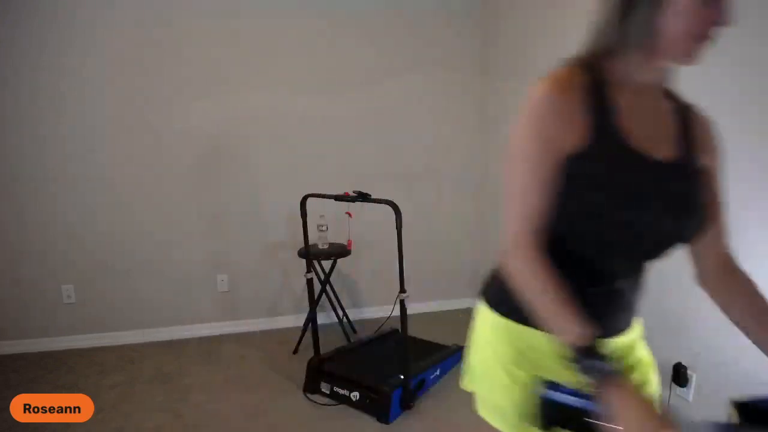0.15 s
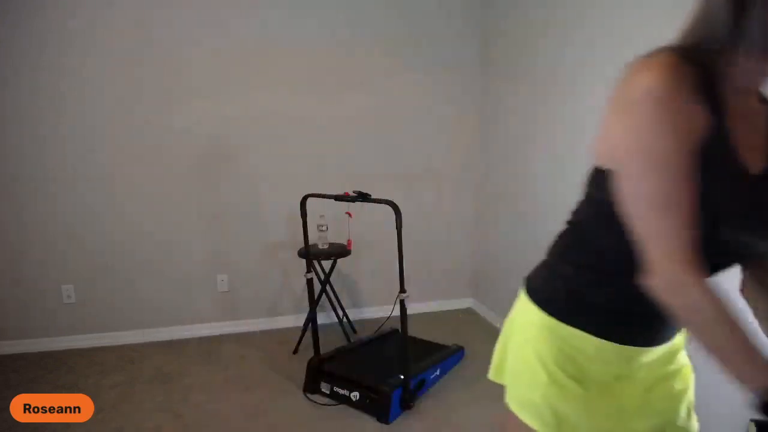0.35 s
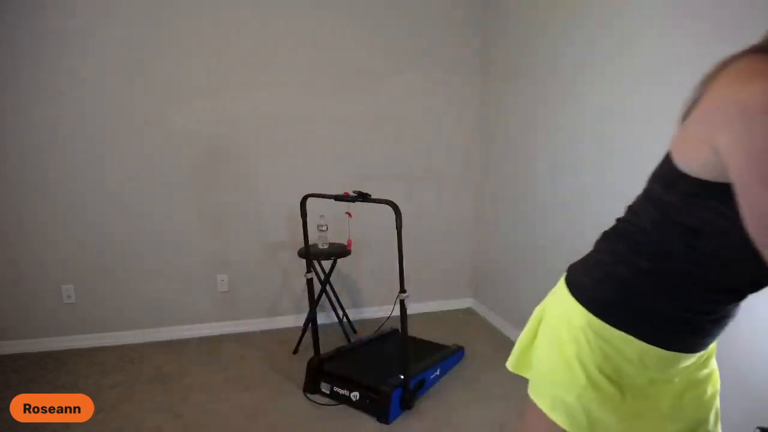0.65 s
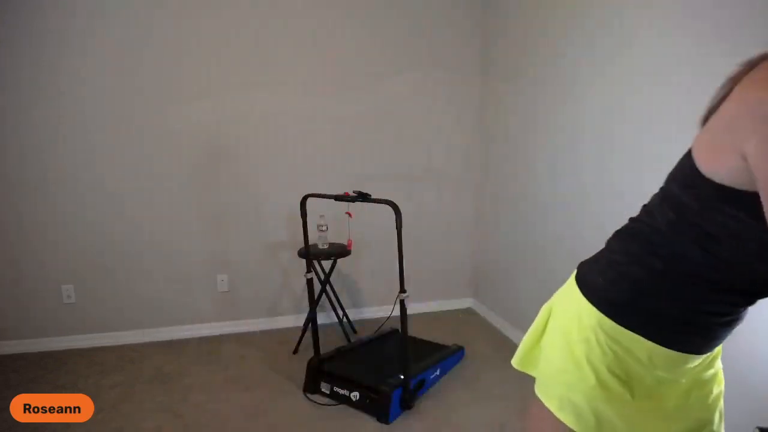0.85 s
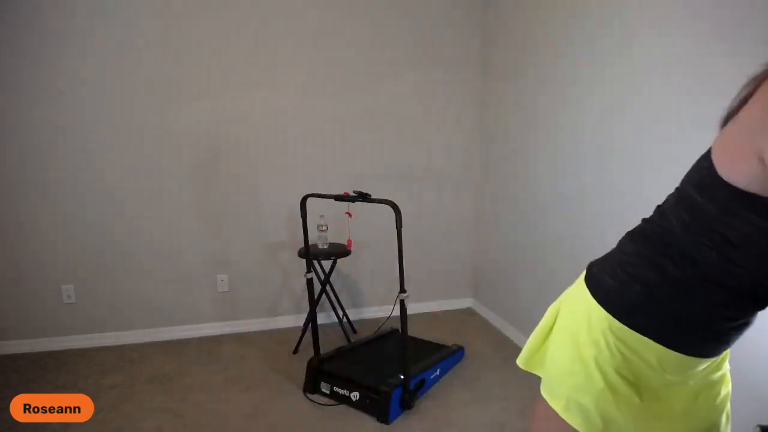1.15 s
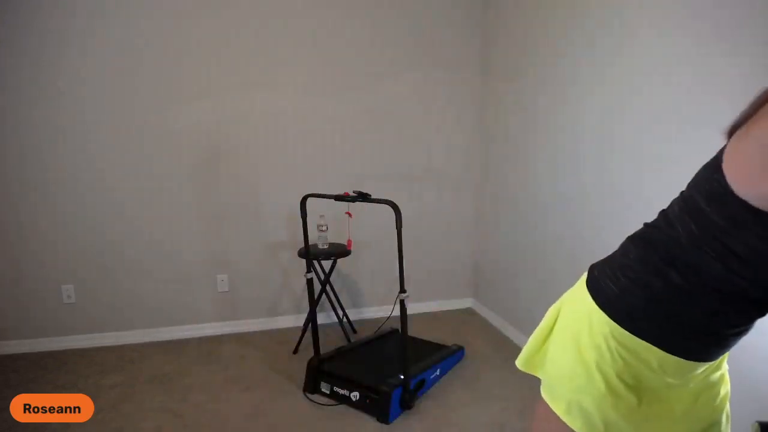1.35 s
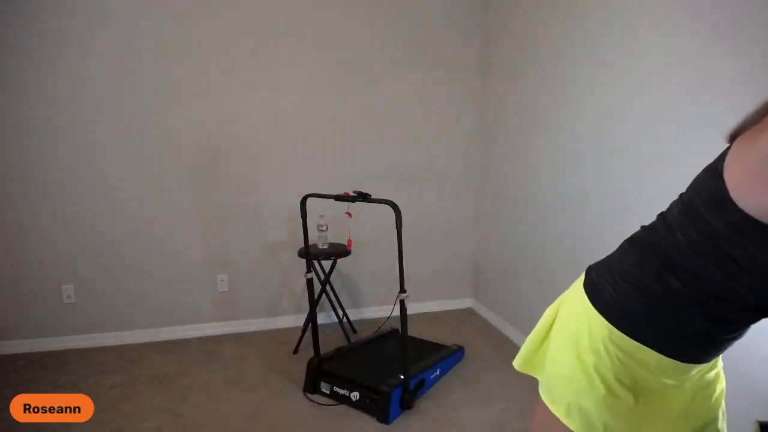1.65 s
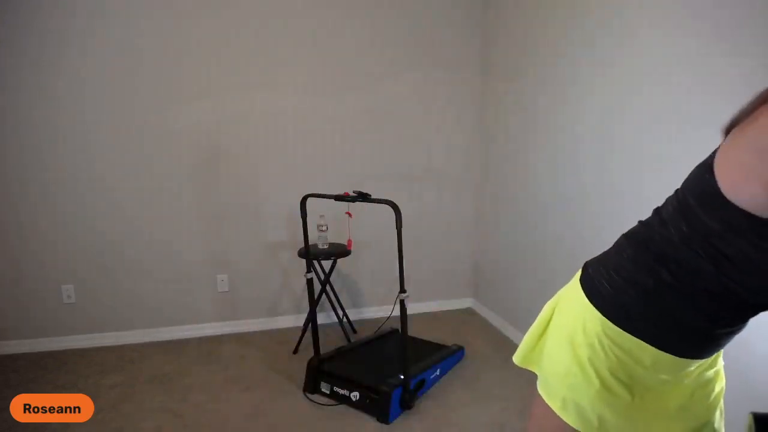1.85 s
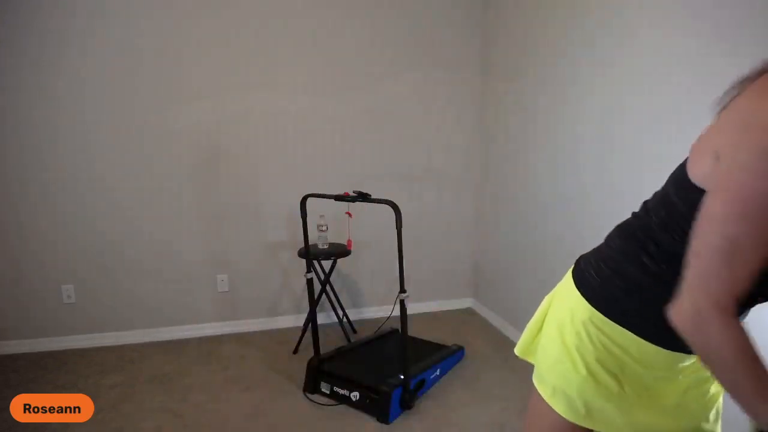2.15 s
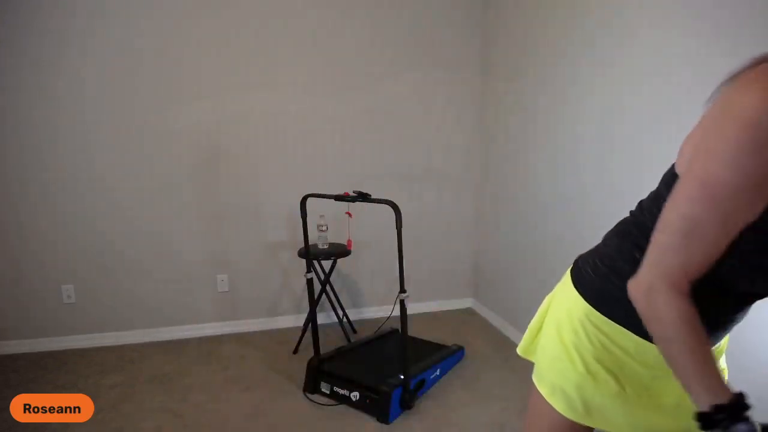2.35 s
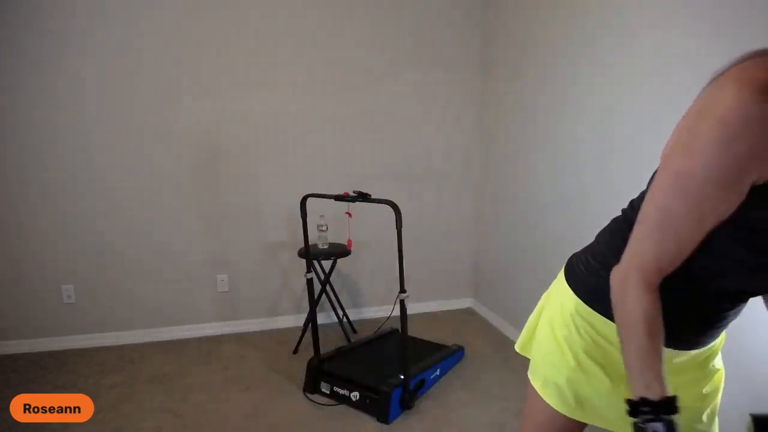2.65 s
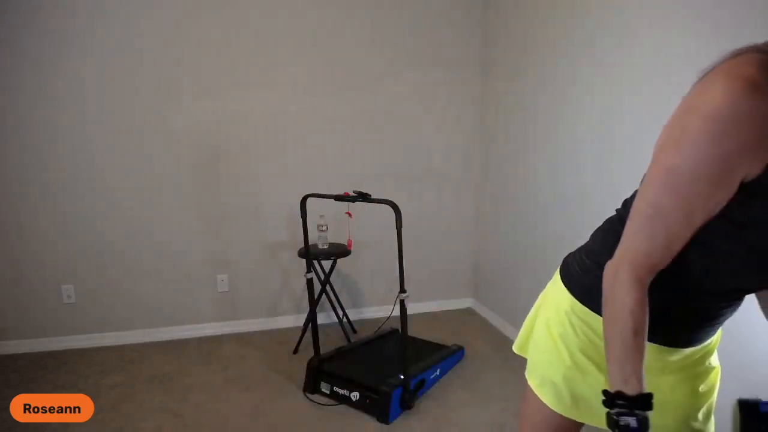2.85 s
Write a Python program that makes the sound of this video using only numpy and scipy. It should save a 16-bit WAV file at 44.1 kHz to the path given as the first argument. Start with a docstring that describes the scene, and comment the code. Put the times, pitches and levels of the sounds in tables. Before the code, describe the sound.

Metal dumbbells clatter onto a stand, close by in a bare room. The loose plates rub faintly until hard, clanging knocks begin at about 0.4 seconds, with a heavy thud near 0.8. Dense rattling follows from 1.2 to 1.7 seconds, then sharp clangs around 2 and from 2.4 to 2.6. Thin metallic ringing lingers between the blows and fades by 3 seconds over a very faint hum.

```python
"""In a bare room, two metal dumbbells are lowered onto their stand, close by.
The loose plates shift softly in the hand, then knock and chatter in a string of hard blows.
Each blow thuds through the stand, clangs in the plates and fills the room. Between blows a plate
or the bar rings on alone, over faint air noise and mains hum. A limiter holds down the loudest blows."""
import sys
import numpy as np
from scipy import signal
from scipy.io import wavfile
from scipy.ndimage import uniform_filter1d, minimum_filter1d

SR = 44100
rng = np.random.default_rng(int(sys.argv[2]) if len(sys.argv) > 2 else 0)


def dump(signal):
    """Clip the signal to [-1, 1] and save it as 16-bit WAV at the path in sys.argv[1]."""
    limited = np.clip(np.atleast_2d(signal).T, -1, 1)
    pcm = np.round(limited * 32767).astype(np.int16)
    wavfile.write(sys.argv[1], SR, pcm)


N = 132300   # 3 seconds

# Levels are relative. A t60 is the time a sound takes to fade by 60 dB.
# The blows. Thud to clash set the four crash bands; knock also sets how hard the stand rings.
# time_s, thud_db, knock_db, clang_db, clash_db, plate_ring_db, typical_bounce_gap_s
BLOW_LIST = [(0.416, -13.5, -15, -12, -26, -14, 0.0064), (0.458, -16.5, -17.5, -3, -19.5, -4, 0.0031),
             (0.501, -35, -44, -10.5, -43, -13, 0.0058), (0.527, -24, -19.5, -11, -30, -9.5, 0.0059),
             (0.637, -25, -20.5, -16, -30.5, -24, 0.0063), (0.664, -35, -24, -13.5, -35.5, -8.5, 0.006),
             (0.697, -37, -33, -31, -55, -23, 0.0059), (0.782, -10.5, -10, -3.5, -20.5, -13, 0.003),
             (0.822, -39, -25, -13.5, -45, -26, 0.0067), (0.892, -26.5, -22, -15.5, -32.5, -25, 0.0057),
             (0.937, -25.5, -24, -26, -40, -18.5, 0.0061), (1.063, -32, -12.5, -10.5, -28.5, -11.5, 0.003),
             (1.202, -34.5, -30.5, -21.5, -40, -37, 0.006),
             (1.252, -22.5, -21.5, -20.5, -35.5, -26, 0.0062),
             (1.292, -22, -16.5, -13.5, -25.5, -17, 0.0063), (1.337, -19.5, -13, -7.5, -19.5, -10, 0.0031),
             (1.357, -18, -19, -5.5, -21, -10, 0.0059), (1.392, -20.5, -19, -23, -27.5, -13.5, 0.006),
             (1.432, -23.5, -17.5, -14, -28, -21, 0.0056), (1.522, -25.5, -22, -19, -37, -21.5, 0.0062),
             (1.567, -48, -19.5, -15.5, -37, -17, 0.006), (1.611, -21, -9, -10.5, -22, -12, 0.0029),
             (1.655, -22.5, -16, -10.5, -27, -9, 0.0062), (1.692, -20, -16.5, -11.5, -25, -14, 0.0055),
             (1.709, -39, -33, -13.5, -58.5, -8.5, 0.0063), (1.909, -46, -25.5, -28.5, -46.5, -26, 0.0066),
             (1.989, -20, -21.5, -11.5, -28.5, -18, 0.0063), (2.039, -30, -20, -13, -25, -5, 0.0058),
             (2.061, -27, -20, -5, -25, 0.5, 0.0029), (2.207, -28.5, -32.5, -21.5, -43.5, -14.5, 0.006),
             (2.317, -44, -27.5, -25.5, -47, -29, 0.0064), (2.388, -21.5, -13.5, -5.5, -20.5, -8.5, 0.0061),
             (2.417, -18, -20.5, -11, -24, -8.5, 0.006), (2.454, -28, -21, -6.5, -36.5, -4.5, 0.006),
             (2.484, -25, -13.5, -8, -22.5, -11, 0.006), (2.517, -17.5, -15, -7.5, -21.5, -0.5, 0.003),
             (2.559, -32, -18.5, -11, -33.5, -9.5, 0.003), (2.719, -29, -25.5, -27.5, -46.5, -25, 0.0058)]
# The four bands of a crash, from thud to clash: low_hz, high_hz, body_t60_s, room_t60_s, room_db
CRASH_BANDS = [(106.5, 375, 0.13, 0.35, -4.5), (400, 1216, 0.064, 0.46, -3.5),
               (1237, 3070, 0.099, .44, -4.5), (3570, 14600, 0.39, 0.34, -0.5)]
# Tone colour of the stand and room together: frequency_hz, level_db
CRASH_COLOUR = [(60, -12), (110, -21), (170, 2), (300, 3), (480, -6), (700, 5), (1050, -2), (1550, 1),
                (2200, 2), (2900, -3), (3700, -0.5), (5000, -9.5), (7000, -12), (10000, -25),
                (15000, -31.5)]
# Natural tones of the plates: pitch_hz, level_db, t60_s
PLATE_TONES = [(1492, -11, 0.48), (1517, -10, .42), (1571, -10, .4), (1651, -10.5, 0.48),
               (1990, -21.5, 0.78), (2044, -15.5, 0.49), (2228, -11, 0.23), (2760, -17.5, 0.14),
               (2856, -18, 0.36), (3032, -17, 0.32), (3097, -16.5, 0.25), (4152, -24.5, 0.37),
               (4740, -36, 0.73), (7120, -35.5, .3)]
# Natural tones of the stand: pitch_hz, level_db, t60_s
STAND_TONES = [(170.3, -20, 0.27), (220.7, -13, 0.5), (389.5, -7, 0.31), (583, -3.5, 0.1), (668, -4, 0.31),
               (741, -9.5, 0.58), (1190, -30.5, 0.44)]
# A plate or the bar ringing alone: start_s, pitch_hz, level_db, t60_s, waver_0_to_1
FREE_RINGS = [(0.558, 4200, -15, 0.17, 0.35), (0.946, 1975, -15.5, 0.46, 0),
              (1.482, 4160, -21.5, 0.13, 0.5), (1.49, 1975, -19, 0.47, .2), (1.52, 2980, -26.5, 0.49, 0.6),
              (1.572, 4190, -28, 0.4, 0.56), (2.039, 3030, -10.5, 0.16, 0.8),
              (2.045, 4270, -20, 0.085, 0.63), (2.133, 4195, -24.5, 0.2, 0.65),
              (2.165, 3030, -21.5, 0.33, 0.65), (2.18, 2002, -25.5, 2.8, 0.13), (2.18, 6250, -55, 2.7, 0.2),
              (2.419, 4190, -17.5, 0.23, 0.4), (2.519, 4226, -10.5, 0.089, 0.1),
              (2.521, 2940, -12, 0.34, 0.9), (2.562, 2997, -13.5, 0.36, 0.8),
              (2.73, 4220, -35.5, 0.1, 0.74), (2.812, 1999, -30, 0.43, .2), (2.899, 1997, -39, 0.27, 0.2),
              (2.82, 3010, -50.5, 0.14, 0.63), (2.82, 4195, -53.5, 0.17, 0.7)]
# Hollow knocks on the stand: start_s, pitch_hz, width_hz, level_db
STAND_KNOCKS = [(1.067, 633, 169, -17), (1.616, 950, 400, -11)]
# Bright cracks where steel meets steel: start_s, level_db
STEEL_CRACKS = [(.464, -23), (.786, -27.5), (1.345, -30), (2.064, -20), (2.393, -27.5)]
# Tone colour of those cracks: frequency_hz, level_db
STEEL_COLOUR = [(1500, -25.5), (3500, 0), (5500, -1.5), (8000, -6), (11000, -15), (15000, -20.5)]
# Loudness of the plates rubbing before they land: time_s, level_db
RUB_LEVELS = [(0, -64), (.03, -59), (.07, -48.5), (.16, -55), (.225, -49.5), (.3, -56.5), (.4, -85)]
# Tone colour of that rubbing: frequency_hz, level_db
RUB_COLOUR = [(100, -13), (250, -3), (500, -7), (1000, -8.5), (1500, -11), (1900, -6), (2400, -7.5),
              (3300, -11), (5000, -16.5), (7000, -19), (10000, -32), (15000, -41)]
# Tone colour of the still air: frequency_hz, level_db
ROOM_COLOUR = [(30, -13), (120, 2), (400, -4.5), (2000, -12), (6000, -27.5), (15000, -47)]


def chatter(gap_s, count=5, first_bounce_db=-5.5, loss_db=2.5):
    """Each blow is one contact and a few uneven, weakening bounces: gives their times and forces."""
    blow_s = np.array(BLOW_LIST)[:, :1]
    gaps = gap_s[:, None] * rng.uniform(.3, 1.7, (len(blow_s), count))
    gaps[:, 0] = 0
    contact = np.arange(count)
    force = from_db((contact > 0) * (first_bounce_db - loss_db * (contact - 1)))
    direction = rng.choice([-1, 1], gaps.shape)
    return blow_s + np.cumsum(gaps, axis=1), force / np.linalg.norm(force) * direction


def crash(times, forces, level_db=-1.5, build_up_s=0.0033, rattle_db=2.0, rattle_hz=256):
    """Each blow lands on a new spot and wakes countless close tones, along with the room's echo."""
    t = np.arange(N // 4) / SR
    noise = coloured_noise(CRASH_COLOUR) * from_db(rattle_db * wobble(rattle_hz))
    bands, fades = [], []
    for low_hz, high_hz, body_t60, room_t60, room_db in CRASH_BANDS:
        bands.append(rms_one(band_pass(noise, low_hz, high_hz, order=4)))
        body_power = .5 * fade(t, body_t60) ** 2
        room_power = (from_db(room_db) * fade(t, room_t60)) ** 2
        fades.append(np.sqrt(body_power + room_power))
    bands = np.array(bands)
    envelopes = np.array(fades) * (1 - np.exp(-t / build_up_s))   # swells as the echoes arrive
    spots = rng.integers(0, N - len(t), len(BLOW_LIST))   # each blow gets its own stretch of noise
    out = np.zeros(2 * N)
    for blow, contact_times, contact_forces, spot in zip(BLOW_LIST, times, forces, spots):
        band_gains = from_db(blow[1:5])   # thud, knock, clang, clash
        hit = band_gains @ (bands[:, spot:spot + len(t)] * envelopes)
        for start, force in zip((contact_times * SR).astype(int), contact_forces):
            out[start:start + len(t)] += force * hit
    return from_db(level_db) * out[:N]


def struck_metal(tones, times, forces, blow_db, spread_db=2.5, waver_hz=32):
    """Every blow strikes each natural tone with its own strength; echoes make it swell and waver."""
    out = 0
    for k, (hz, db, t60) in enumerate(tones):
        chance_db = spread_db * (2 * rng.random(len(blow_db)) - 1.5)
        strength = from_db(blow_db + db + chance_db)
        taps = clicks(times, forces * strength[:, None])
        tone = band_pass(ring(taps, hz, t60), hz * .9, hz * 1.1, order=1)   # softens the start
        out = out + (-1) ** k * tone * (1 + wobble(waver_hz))
    return out / np.sqrt(2)


def free_rings(waver_hz=30, settle_s=2.945, settle_t60_s=0.087):
    """Metal that has come clear of its neighbours rings in single tones; echoes make them waver."""
    out, t = np.zeros(N), np.arange(N) / SR
    echoes = (wobble(waver_hz) + 1j * wobble(waver_hz)) / np.sqrt(2)   # moves both level and phase
    for start_s, hz, db, t60, depth in FREE_RINGS:
        span = slice(int(start_s * SR), int((start_s + 2 * t60) * SR))
        waver = (1 + depth * np.roll(echoes, rng.integers(N))[span]) / np.hypot(1, depth)
        tone = np.imag(waver * np.exp(2j * np.pi * hz * t[span]))
        out[span] += from_db(db) * swell_and_fade(start_s, t60)[span] * tone
    return out * fade(np.maximum(t - settle_s, 0), settle_t60_s)   # a hand grips the metal and stills it


def hollow_knocks(t60_s=0.17):
    """A blow square on the stand wakes one broad cluster of its tones."""
    out = 0
    for start_s, hz, width_hz, db in STAND_KNOCKS:
        cluster = band_pass(rng.standard_normal(N), hz - width_hz / 2, hz + width_hz / 2)
        out = out + from_db(db) * swell_and_fade(start_s, t60_s) * rms_one(cluster)
    return out


def cracks(t60_s=0.12):
    """A hard hit, edge first, adds a short spray of the highest tones."""
    envelope = sum(from_db(db) * swell_and_fade(start_s, t60_s) for start_s, db in STEEL_CRACKS)
    return envelope * coloured_noise(STEEL_COLOUR)


def shifting_plates(sing_db=-8, scrape_s=.228, scrape_width_s=.028, scrape_db=-56):
    """The carried plates rub and sing faintly, and one slips on its bar with a short scrape."""
    t = np.arange(N) / SR
    sing = from_db(sing_db) * rms_one(ring(rng.standard_normal(N), hz=1443, t60_s=0.068))
    slip = from_db(scrape_db) * np.exp(-((t - scrape_s) / scrape_width_s) ** 2)
    scrape = slip * rms_one(ring(rng.standard_normal(N), hz=2450, t60_s=.015))
    rub_s, rub_db = np.transpose(RUB_LEVELS)
    rub_level = np.interp(t, rub_s, from_db(rub_db), right=0)
    return rub_level * (coloured_noise(RUB_COLOUR) + sing) + scrape


def room_tone(air_db=-58.5, hum_hz=112, hum_db=-59.5):
    """Still air and a mains hum."""
    hum = np.sqrt(2) * np.sin(2 * np.pi * hum_hz * np.arange(N) / SR)
    return from_db(air_db) * coloured_noise(ROOM_COLOUR) + from_db(hum_db) * hum


def suppress_noise(x, threshold_db=-70.5, db_per_octave=-3, deepest_cut_db=-8, size=1024):
    """A noise suppressor turns down faint frequencies; its threshold is set at 1 kHz and tilted."""
    hz, _, frames = signal.stft(x, SR, nperseg=size)
    power = uniform_filter1d(np.abs(frames) ** 2, size=3, axis=-1)   # smooth over time
    power = uniform_filter1d(power, size=3, axis=-2)   # and over frequency
    octaves = np.log2(np.maximum(hz, 100) / 1000)
    threshold = from_db(threshold_db + db_per_octave * octaves)[:, None] ** 2
    gain = np.maximum(power / (power + threshold), from_db(deepest_cut_db))
    return signal.istft(frames * gain, SR, nperseg=size)[1][..., :N]


def limit(x, ceiling=1, window_s=.004):
    """A fast limiter dips the level around every peak that would pass the ceiling."""
    span = int(window_s * SR)
    gain = ceiling / np.maximum(np.abs(x), ceiling)
    return x * uniform_filter1d(minimum_filter1d(gain, span), span)


def from_db(db):
    """Turn decibels into a number to multiply by."""
    return 10 ** (np.asarray(db) / 20)


def rms_one(x):
    """Scale a signal so its average level (rms) is 1."""
    return x / np.sqrt(np.mean(x ** 2) + 1e-20)


def band_pass(x, low_hz, high_hz, order=2):
    """Keep what lies between two frequencies."""
    return signal.sosfilt(signal.butter(order, [low_hz, high_hz], "band", fs=SR, output="sos"), x)


def coloured_noise(colour):
    """Noise built from narrow bands whose levels follow a tone colour table."""
    hz, db = np.transpose(colour)
    edges = np.geomspace(30, 18000, 29)
    white, out = rng.standard_normal((2, N)), 0
    for k, (low, high) in enumerate(zip(edges, edges[1:])):
        band_db = np.interp(np.log(low * high) / 2, np.log(hz), db)
        out = out + band_pass(white[k % 2], low, high) * from_db(band_db)
    return rms_one(out)


def clicks(times, gains):
    """Single clicks at the given times."""
    samples = np.clip(times * SR, 0, N).astype(int)
    return np.bincount(samples.ravel(), np.ravel(gains), N + 1)[:N]


def ring(force, hz, t60_s):
    """Every push sets a pure, fading tone ringing."""
    decay, angle = fade(1 / SR, t60_s), 2 * np.pi * hz / SR   # both per sample
    return signal.lfilter([0, np.sin(angle)], [1, -2 * decay * np.cos(angle), decay ** 2], force + 1e-18)


def fade(age_s, t60_s):
    """A level that falls by 60 dB every t60_s."""
    return 10 ** (-3 * age_s / t60_s)


def swell_and_fade(start_s, t60_s, attack_s=0.001):
    """A quick rise, then an even fade."""
    age_s = np.maximum(np.arange(N) / SR - start_s, 0)
    return (1 - np.exp(-age_s / attack_s)) * fade(age_s, t60_s)


def wobble(hz):
    """Smooth random motion, about 1 in size, with rates up to about hz."""
    step = 16   # samples per random value
    smoothing = signal.butter(2, hz, fs=SR / step, output="sos")
    slow = signal.sosfilt(smoothing, rng.standard_normal(2 * N // step))
    return np.interp(np.arange(N) / step, np.arange(N // step), rms_one(slow[-(N // step):]))


def scene(plates_db=-2, stand_db=-2.5):
    """Blows on plates and stand, free rings, handling and the quiet room, in one channel."""
    _, _, knock_db, _, _, ring_db, gap_s = np.transpose(BLOW_LIST)
    times, forces = chatter(gap_s)
    plates = from_db(plates_db) * struck_metal(PLATE_TONES, times, forces, ring_db)
    stand = from_db(stand_db) * struck_metal(STAND_TONES, times, forces, knock_db) + hollow_knocks()
    blows = crash(times, forces) + cracks() + plates + stand
    return (blows + free_rings() + shifting_plates() + room_tone())[None]


def record(dry, low_cut_hz=70, high_cut_hz=15900):
    """Cut the deep bass, turn down faint sound, limit the peaks and cut the highest treble."""
    low_cut = signal.butter(2, low_cut_hz, "high", fs=SR, output="sos")
    high_cut = signal.ellip(12, .1, 80, high_cut_hz, fs=SR, output="sos")
    cleaned = suppress_noise(signal.sosfilt(low_cut, dry))
    return signal.sosfilt(high_cut, limit(cleaned))


dry = scene()
out = record(dry)
dump(out)
```